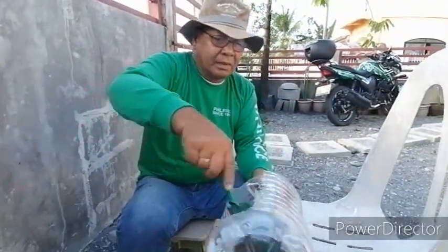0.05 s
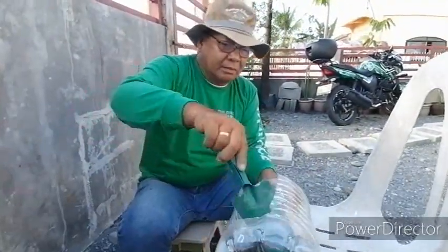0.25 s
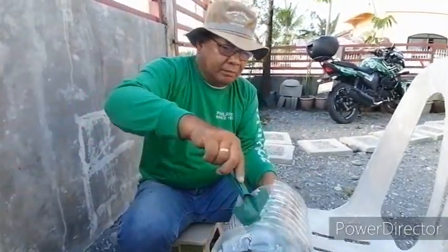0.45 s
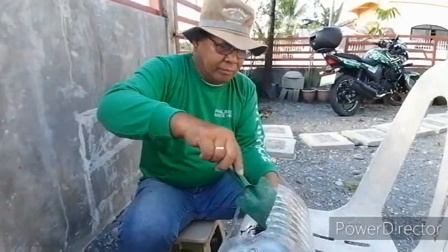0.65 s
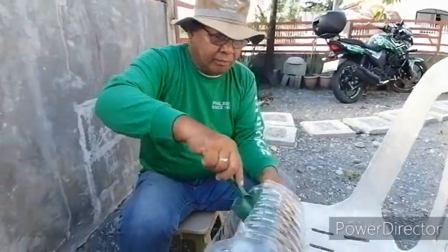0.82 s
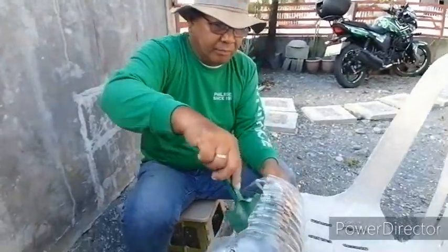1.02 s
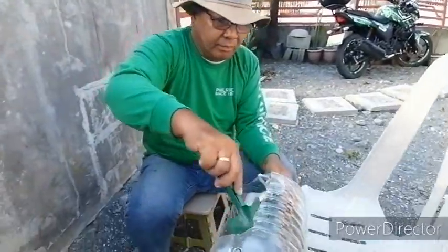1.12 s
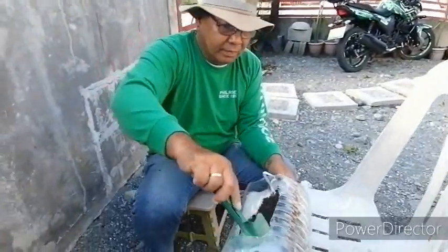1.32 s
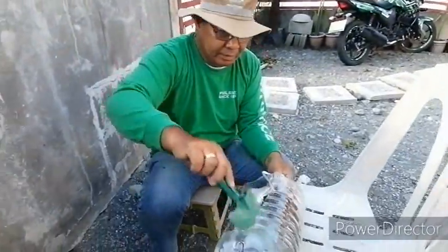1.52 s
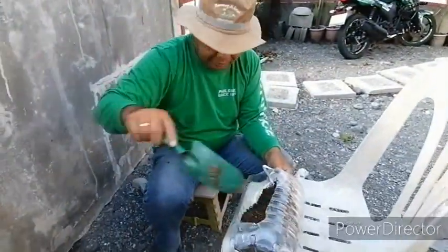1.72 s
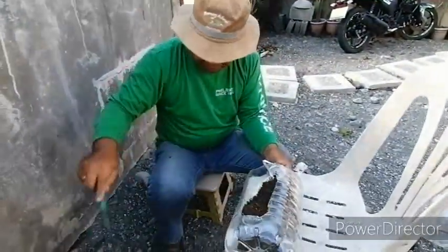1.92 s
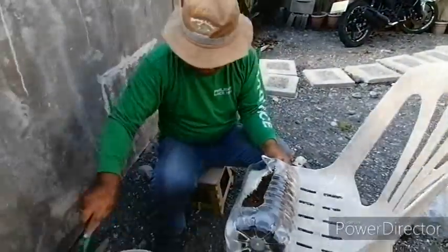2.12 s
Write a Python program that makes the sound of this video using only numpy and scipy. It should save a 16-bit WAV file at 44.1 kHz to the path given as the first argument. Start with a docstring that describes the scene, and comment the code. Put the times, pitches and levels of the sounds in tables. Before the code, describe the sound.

In a quiet yard, gritty soil crunches as a trowel works inside a thin plastic bottle, which knocks and crackles with the strokes. The digging eases briefly midway and resumes, and soft wind brushes the microphone at the end.

```python
"""In a quiet yard, a hand trowel works soil inside a cut-open thin plastic bottle.
Friction with the grit makes trains of tiny impacts, and jolts of the blade make short bursts of them.
Both drive four voices: the hollow body's boom, the wall's knock, a crunch and a treble crackle.
The thin wall buckles with a pop; the blade rings when knocked and now and then squeaks on the rim.
Behind are faint air, far whistles and a high chirp; air buffets the microphone near the end."""
import sys
import numpy as np
from scipy import signal
from scipy.fft import rfft, irfft
from scipy.io import wavfile

SR = 44100
rng = np.random.default_rng(int(sys.argv[2]) if len(sys.argv) > 2 else 0)


def transcribe(signal):
    """Save signal, clipped to [-1, 1], as a 16-bit WAV file at the path in sys.argv[1]."""
    frames = np.atleast_2d(signal).T
    limited = np.clip(frames, -1, 1)
    pcm = np.round(limited * 32767).astype(np.int16)
    wavfile.write(sys.argv[1], SR, pcm)


N = 94815

# Jolts of the blade on the bottle: start_s, length_s, boom_db, wall_db, crunch_db, crackle_db
JOLTS = [(0.205, 0.019, -34, -34.5, -35, -38), (0.253, 0.0081, -35.5, -33, -37, -38.5),
         (0.489, 0.0081, -33, -30, -31.5, -63), (0.511, 0.0087, -33.5, -34, -55, -44),
         (0.535, 0.01, -26, -36, -35, -56), (0.5602, 0.0072, -28.5, -24.5, -31.5, -34),
         (0.572, 0.01, -31.5, -35, -47, -46), (0.593, 0.0073, -38, -32.5, -33, -37),
         (0.68, 0.012, -40.5, -37.5, -55.5, -60), (0.734, 0.011, -69, -43, -47.5, -48.5),
         (0.756, 0.0041, -44, -35.5, -42.5, -44.5), (0.767, 0.013, -43.5, -47.5, -49, -41.5),
         (0.803, 0.0066, -50, -40, -43.5, -35.5), (0.968, 0.018, -41.5, -37.5, -39.5, -39),
         (1.0122, 0.008, -42.5, -37, -45, -52), (1.128, 0.013, -33, -30.5, -30.5, -26.5),
         (1.236, 0.0023, -39, -37, -38, -40), (1.267, 0.0046, -34.5, -34.5, -39, -42.5),
         (1.312, 0.011, -43, -47.5, -45.5, -53.5), (1.3528, 0.0065, -37, -35, -45, -50),
         (1.367, 0.0088, -34.5, -32, -36, -35), (1.41, 0.007, -36.5, -39, -40, -35.5),
         (1.439, 0.0076, -30, -38, -39.5, -39.5), (1.681, 0.0031, -34, -42.5, -31.5, -41),
         (1.712, 0.012, -39.5, -53, -47, -40.5), (1.7823, 0.0071, -38.5, -36, -46, -40),
         (1.801, 0.019, -39, -39, -35.5, -32.5)]
# Course of the scraping: time_s, body_db, crunch_db, crackle_db
SCRAPE_LEVELS = [(0.208, -41, -57, -46), (0.236, -35.5, -44.5, -38.5), (0.27, -40.5, -48, -41),
                 (0.31, -39.5, -43.5, -41.5), (0.343, -46, -58, -43.5), (0.42, -38.5, -51, -43),
                 (0.444, -37, -34, -36), (0.475, -30.5, -39, -38.5), (0.53, -38, -40, -46),
                 (0.586, -28.5, -34, -39), (0.61, -31.5, -40.5, -42.5), (0.639, -38, -45, -56),
                 (0.699, -44, -48.5, -55), (0.728, -60, -58, -77), (0.79, -46.5, -45, -41),
                 (0.819, -42, -54, -43.5), (0.851, -58.5, -64, -49.5), (0.89, -64, -64.5, -64),
                 (0.966, -70, -64, -68), (1.0, -45, -52, -51), (1.036, -34, -53.5, -52),
                 (1.08, -51.5, -63, -61), (1.12, -56.5, -74, -83), (1.156, -34, -44, -41.5),
                 (1.176, -35, -41, -41), (1.203, -41.5, -50, -51.5), (1.253, -39, -43, -47.5),
                 (1.305, -51.5, -57, -57.5), (1.34, -40, -45.5, -54.5), (1.4, -39.5, -47, -47.5),
                 (1.46, -39, -50.5, -43), (1.509, -37, -47, -36.5), (1.575, -42, -49, -35.5),
                 (1.599, -41.5, -48, -43.5), (1.63, -69, -69, -58), (1.651, -42, -52.5, -48.5),
                 (1.678, -53, -71, -60), (1.701, -36.5, -43, -43), (1.745, -55, -59, -52),
                 (1.781, -57, -61.5, -65), (1.796, -49, -38, -41), (1.828, -37, -69, -41),
                 (1.848, -44.5, -52, -48), (1.919, -73, -74, -68)]
# The wall's share of the body level, smaller while the blade digs deep: time_s, gain_db
WALL_SHARE = [(1.2, -8), (1.72, -10.5), (1.8, -9)]
# Buckles of the wall, pitched by the spot pressed: start_s, pitch_hz, level_db, t60_s
BUCKLES = [(0.2128, 694, -17, 0.065), (0.2099, 1330, -26, 0.072), (.253, 401, -28.5, 0.12),
           (.56, 358, -20.5, 0.06), (.688, 414, -30.5, 0.11), (.737, 654, -26.5, 0.044),
           (.756, 691, -24, 0.054), (1.018, 699, -31, 0.088), (1.131, 707, -21.5, 0.064),
           (1.132, 1050, -22, 0.025), (1.135, 1390, -24, 0.052), (1.222, 694, -30.5, 0.076),
           (1.237, 1510, -30, 0.036), (1.2751, 409, -27, 0.15), (1.354, 224, -33, 0.16),
           (1.378, 686, -40, 0.026), (1.444, 226, -34.5, 0.18), (1.443, 399.3, -26, 0.2),
           (1.715, 413, -28.5, 0.15), (1.804, 777, -30.5, 0.085)]
# Snaps of grit and creased plastic: start_s, level_db
SNAPS = [(0.0662, -45), (0.2812, -29), (0.2838, -27), (0.301, -33), (0.3265, -34.5), (.428, -32),
         (.447, -41), (0.5471, -31.5), (.5615, -27.5), (0.5985, -42), (0.8229, -33.5), (1.555, -35),
         (1.696, -31.5), (1.7845, -24.5), (1.827, -33)]
# Knocks that ring the blade: start_s, level_db
BLADE_TAPS = [(1.6825, -26), (1.697, -35), (1.72, -44)]
# Rim squeaks and far whistles: centre_s, width_s, pitch_hz, relative_db
RIM_SQUEAKS = [(0.2113, 0.0037, 3130, -34.5), (0.2378, 0.0017, 2980, -29.5), (0.2503, 0.004, 2960, -23),
               (0.271, 0.022, 2954, -43), (0.467, 0.0054, 4400, -39)]
FAR_WHISTLES = [(0.019, 0.018, 1790, -52), (1.105, 0.032, 1730, -58)]
# Rustles of soil and buffets of air: centre_s, width_s, level_db
SOIL_RUSTLES = [(0.016, 0.016, -52), (.08, 0.025, -55.5)]
AIR_BUFFETS = [(1.757, 0.058, -48), (2.044, 0.019, -42), (2.104, 0.018, -44.5)]

# Modes of the hollow body, the wall, the stiff rim and the blade: pitch_hz, gain_db, t60_s
BOOM_MODES = [(225.8, -7, 0.16), (295.5, -5, 0.13), (375, 4.5, 0.048), (402, 3, 0.055), (469.6, 3, 0.043)]
WALL_MODES = [(570, 2, 0.017), (670, 5.5, 0.144), (727, 3.4, 0.015)]
RIM_MODES = [(1255, 1, 0.077), (1662, 6.3, 0.054), (1980, 3.8, 0.083), (2770, 14, 0.041), (3146, 18, 0.028)]
BLADE_MODES = [(1195, -7, 0.035), (1490, -9, 0.038), (2107, -2.5, 0.057), (2153, -2, 0.053),
               (5160, 1.5, 0.027), (5560, 3.5, 0.021), (7000, -9, 0.048)]
# Broad, non-ringing spectra of the four voices: frequency_hz, gain_db
BOOM_SPECTRUM = [(40, -21), (110, -13), (200, -3.5), (380, 4.5), (500, 1), (750, 2), (1500, -40.5),
                 (6000, -98)]
WALL_SPECTRUM = [(250, -35), (480, -2.5), (650, 8.5), (830, 1.5), (1000, -11), (2200, -42.5), (8000, -101)]
CRUNCH_SPECTRUM = [(450, -21), (950, -4.5), (1350, 11.5), (1850, 4), (2400, 5), (3000, 2), (3700, -7),
                   (6000, -56), (14000, -74)]
CRACKLE_SPECTRUM = [(1700, -29), (2700, -3.5), (3400, -10.5), (3950, -10), (4500, -1.5), (5300, 2),
                    (6400, -3), (7500, -1), (9200, -9), (12000, -16.5), (15000, -16.5), (16000, -34)]
# Noise spectra of loose soil, still air and buffets: frequency_hz, gain_db
RUSTLE_SPECTRUM = [(1500, -15.5), (3400, -7.5), (4200, -10.5), (5100, 1.5), (5900, -15.5), (9000, -30)]
AIR_SPECTRUM = [(25, -9), (100, -8), (160, -11), (450, -13.5), (640, -14), (1100, -18), (1600, -23),
                (3000, -22), (3900, -33.5), (5500, -23), (6500, -24), (7300, -16.5), (8500, -18),
                (9400, -30.5), (16000, -40)]
BUFFET_SPECTRUM = [(20, -28), (50, -21), (85, 1), (115, -8), (170, -17), (350, -25.5), (900, -59)]
# Ringing relative to the broad part of a voice: boom_db, wall_db, crunch_db
RING_DB = [1, -14.5, -24]
# Left-right correlation of each voice's drive, 0 to 1: boom, wall, crunch, crackle
VOICE_COHERENCE = [0.97, 0.89, 0.11, 0.023]
# Left-right correlation of the steady noises: frequency_hz, coherence
NOISE_COHERENCE = [(30, 0.14), (100, 0.89), (500, 0.64), (1500, 0.046), (6000, 0.034)]
# Stereo balance of the digging: frequency_hz, left_minus_right_db
BALANCE = [(100, -4.5), (350, 2), (700, 1.5), (1400, 1.5), (2700, -2.5), (4200, -7), (5500, -8), (7000, -8),
           (9000, -0.5), (14000, -2.5)]
# Scatter from the yard relative to the direct sound: boom_db, wall_db, crunch_db, crackle_db
YARD_DB = [-7, -6.5, -16, -23]

YARD_T60_S, YARD_DELAY_S = 0.11, 0.0018
JOLT_RISE_S, JOLT_FALL_S, RING_ON_S = 0.0014, 0.0037, 0.00314
SPOT_DETUNE, WHISTLE_JITTER = 0.07, 0.024  # fractions of the pitch
CLUMP_DB, BOOM_SHARE_DB = 1.8, -4
POP_RISE_S, SNAP_DECAY_S = 0.00066, 0.0031
CHIRP_S, CHIRP_HZ, CHIRP_FALL_HZ_PER_S = 0.895, 9750, 16000
CUTOFF_HZ = 16000


def blade_jolts(voices, size=10000):
    """Impact excitation: a burst of slips drives all four voices; the rim's pitches vary with the spot."""
    out, t = np.zeros((2, N)), np.arange(size) / SR
    boom, wall, _, crackle = voices
    for start_s, length_s, *levels in JOLTS:
        spot_modes = [(hz * (1 + SPOT_DETUNE * rng.uniform(-0.986, 1)), db, t60)
                      for hz, db, t60 in RIM_MODES]
        crunch = voice(CRUNCH_SPECTRUM, YARD_DB[2], spot_modes, ring_db=-4)
        push = np.minimum(t / JOLT_RISE_S, 1) * np.exp(-np.maximum(t - length_s, 0) / JOLT_FALL_S)
        slips = push * grains(size, per_s=3200, spread_db=3)
        for response, coherence, db in zip((boom, wall, crunch, crackle), VOICE_COHERENCE, levels):
            add(out, start_s, strike(correlate(slips, coherence), response, db, length_s + RING_ON_S))
    return out


def soil_scrape(voices):
    """Granular friction: clumps of grains rub along blade and bottle and drive the four voices."""
    out, t = np.zeros((2, N)), np.arange(N) / SR
    times, body_db, crunch_db, crackle_db = np.transpose(SCRAPE_LEVELS)
    grit = grains(N, per_s=2200, spread_db=1) * amp(CLUMP_DB * drift(time_s=0.002))
    wall_db = body_db + np.interp(times, *np.transpose(WALL_SHARE))
    levels = (body_db + BOOM_SHARE_DB, wall_db, crunch_db, crackle_db)
    for response, coherence, db in zip(voices, VOICE_COHERENCE, levels):
        envelope = amp(np.interp(t, times, db, left=-90, right=-90))
        out += convolve(unit(correlate(grit, coherence)) * envelope, response)
    return out


def wall_pops(size=10000):
    """Buckling: the thin wall gives way and rings as a damped sinusoid."""
    out, t = np.zeros((2, N)), np.arange(size) / SR
    attack = 1 - np.exp(-t / POP_RISE_S)
    for start_s, hz, db, t60 in BUCKLES:
        pop = attack * amp(db - 60 * t / t60) * np.sin(2 * np.pi * hz * t)
        add(out, start_s, pop[None])
    return out


def snaps(crackle, size=6000):
    """Transient excitation: grit and creased plastic release brief, bright bursts of noise."""
    out, t = np.zeros((2, N)), np.arange(size) / SR
    for start_s, db in SNAPS:
        burst = rng.standard_normal((2, size)) * np.exp(-t / SNAP_DECAY_S)
        add(out, start_s, strike(burst, crackle, db, window_s=0.0025))
    return out


def blade_ring(size=10000):
    """Free vibration: the knocked blade rings in inharmonic, decaying modes."""
    out, t = np.zeros((2, N)), np.arange(size) / SR
    for start_s, tap_db in BLADE_TAPS:
        for hz, db, t60 in BLADE_MODES:
            cycles = hz * t + rng.random() + 0.18 * rng.random((2, 1))  # phase differs by channel
            add(out, start_s, amp(tap_db + db - 60 * t / t60) * np.sin(2 * np.pi * cycles))
    return out


def rim_squeaks():
    """Stick-slip friction: the blade catches the rim in short, unsteady tones."""
    squeaks = sum(swell(s, width, db) * wavering(hz, jitter_hz=55) for s, width, hz, db in RIM_SQUEAKS)
    return 2 * squeaks * amp([[-10], [0]])  # weaker on the left


def soil_rustles():
    """Sliding friction: loose soil shifts on the blade in soft swells of noise."""
    return sum(swell(*row) for row in SOIL_RUSTLES) * noise(RUSTLE_SPECTRUM)


def yard_background():
    """Superposition: quiet air, far whistles, a faint falling chirp and low buffets of air."""
    whistles = sum(swell(s, width, db) * wavering(hz, WHISTLE_JITTER * hz)
                   for s, width, hz, db in FAR_WHISTLES)
    glide_hz = CHIRP_HZ - CHIRP_FALL_HZ_PER_S * (np.arange(N) / SR - CHIRP_S)
    chirp = swell(CHIRP_S, width_s=0.022, db=-67) * wavering(glide_hz, WHISTLE_JITTER * CHIRP_HZ)
    buffets = sum(swell(*row) for row in AIR_BUFFETS) * noise(BUFFET_SPECTRUM)
    air = amp(-57.5) * noise(AIR_SPECTRUM)
    return air + whistles + chirp + buffets


def voice(spectrum, yard_db, modes=(), ring_db=0, size=8192):
    """Impulse response: a minimum-phase blow, the modes it rings, and scatter from wall and ground."""
    t = np.arange(size) / SR
    log_gain = np.log(amp(curve_at(spectrum, abs(np.fft.fftfreq(size, 1 / SR)))))
    minimum_phase = np.exp(np.conj(signal.hilbert(log_gain)))
    direct = unit(np.fft.ifft(minimum_phase).real)[None]
    if modes:
        ring = sum(amp(db - 60 * t / t60) * np.cos(2 * np.pi * hz * t) for hz, db, t60 in modes)
        direct = direct + amp(ring_db) * unit(convolve(direct, ring[None]))
    echoes = rng.standard_normal((2, size)) * (rng.random((2, size)) < 0.1)
    echoes *= (t > YARD_DELAY_S) * amp(-60 * t / YARD_T60_S)
    scatter = amp(yard_db) * unit(convolve(echoes, direct))
    return unit(unit(direct) + scatter) / np.sqrt(size)


def strike(drive, response, db, window_s):
    """Forced response of a voice, scaled to an rms of db over its opening window."""
    sound = convolve(drive, response)
    onset = sound[:, :max(round(window_s * SR), 8)]
    return amp(db) * sound / np.sqrt(np.mean(onset ** 2) + 1e-20)


def grains(size, per_s, spread_db):
    """Shot noise: two trains of random clicks of uneven strength over a fine fizz."""
    strength = amp(spread_db * np.minimum(rng.exponential(1, (2, size)), 4))
    clicks = strength * rng.choice([-1, 1], (2, size)) * (rng.random((2, size)) < per_s / SR)
    return unit(clicks) + 0.22 * rng.standard_normal((2, size))


def noise(spectrum):
    """Spectral shaping: steady, partly coherent stereo noise of rms 1."""
    hz = np.fft.rfftfreq(N, 1 / SR)
    white = correlate(rfft(rng.standard_normal((2, N))), curve_at(NOISE_COHERENCE, hz))
    return unit(irfft(white * amp(curve_at(spectrum, hz)), N))


def wavering(hz, jitter_hz):
    """Frequency modulation: a tone whose pitch trembles at random."""
    return np.sin(2 * np.pi * np.cumsum(hz + jitter_hz * drift(time_s=0.0008)) / SR)


def drift(time_s):
    """First-order relaxation: smoothed random motion of rms 1."""
    return unit(signal.lfilter([1], [1, -np.exp(-1 / (time_s * SR))], rng.standard_normal(N)))


def swell(centre_s, width_s, db):
    """Gaussian envelope peaking at db."""
    return amp(db) * np.exp(-((np.arange(N) / SR - centre_s) / width_s) ** 2 / 2)


def correlate(channels, coherence):
    """Partial coherence: the right channel takes a share of the left."""
    left, right = channels
    return np.array([left, coherence * left + np.sqrt(1 - coherence ** 2) * right])


def convolve(x, response):
    """Convolution, cut to the input's length."""
    return signal.fftconvolve(x, response, axes=1)[:, :x.shape[1]]


def add(mix, start_s, sound):
    """Superposition of a sound on the mix from start_s."""
    part = mix[:, max(round(start_s * SR), 0):][:, :sound.shape[1]]
    part += sound[:, :part.shape[1]]


def curve_at(points, hz):
    """Interpolation on a log-frequency axis."""
    frequencies, values = np.transpose(points)
    return np.interp(np.log(hz + 1), np.log(frequencies), values)


def amp(db):
    """Decibels to amplitude ratio."""
    return 10 ** (np.asarray(db) / 20)


def unit(x):
    """Normalisation to rms 1."""
    return x / np.sqrt(np.mean(x ** 2) + 1e-20)


def scene():
    """Superposition: the digging, panned by frequency at constant power, over the yard's background."""
    crackle = voice(CRACKLE_SPECTRUM, YARD_DB[3])
    voices = [voice(BOOM_SPECTRUM, YARD_DB[0], BOOM_MODES, RING_DB[0]),
              voice(WALL_SPECTRUM, YARD_DB[1], WALL_MODES, RING_DB[1]),
              voice(CRUNCH_SPECTRUM, YARD_DB[2], RIM_MODES, RING_DB[2]), crackle]
    digging = blade_jolts(voices) + snaps(crackle) + soil_scrape(voices)
    digging += rim_squeaks() + wall_pops() + blade_ring() + soil_rustles()
    left_ratio = amp(curve_at(BALANCE, np.fft.rfftfreq(N, 1 / SR)))
    pan = np.array([left_ratio, np.ones_like(left_ratio)]) * np.sqrt(2 / (1 + left_ratio ** 2))
    return irfft(rfft(digging) * pan, N) + yard_background()


def record(dry):
    """Band limiting by a linear-phase low-pass filter."""
    lowpass = signal.firwin(401, CUTOFF_HZ, window=("kaiser", 9), fs=SR)
    return signal.oaconvolve(dry, lowpass[None], "same")


dry = scene()
out = record(dry)
transcribe(out)
```